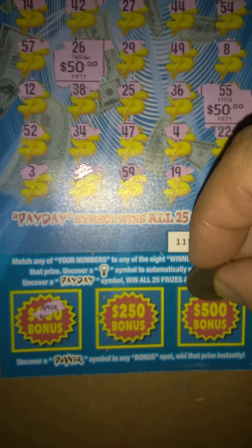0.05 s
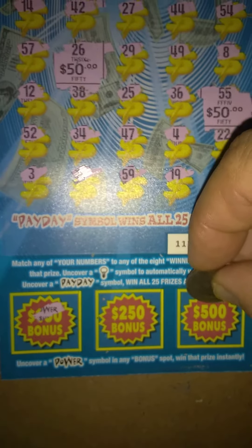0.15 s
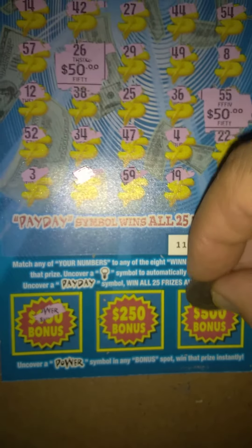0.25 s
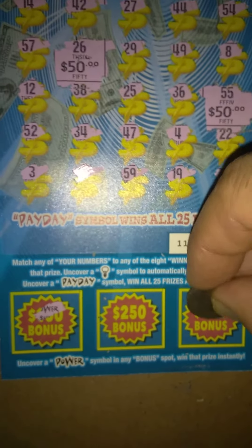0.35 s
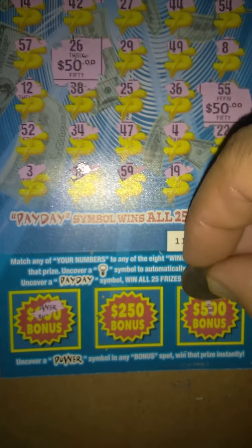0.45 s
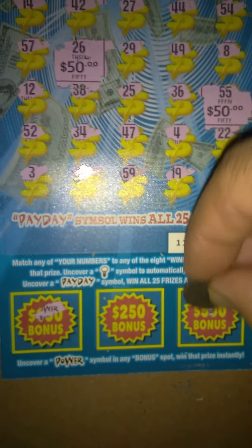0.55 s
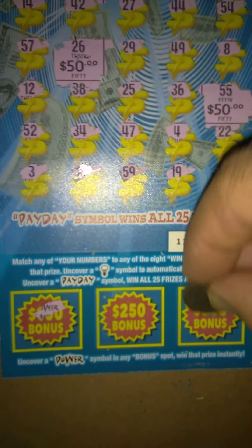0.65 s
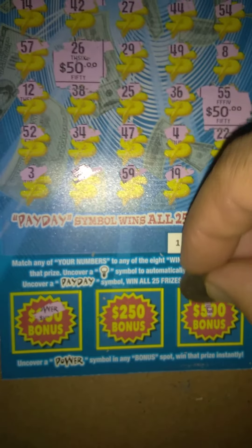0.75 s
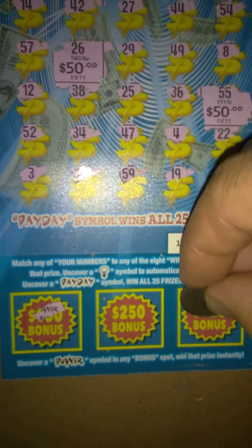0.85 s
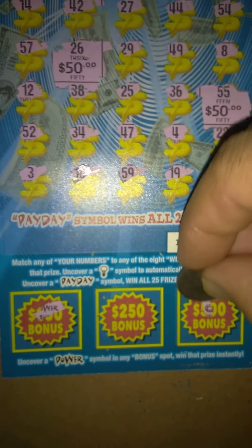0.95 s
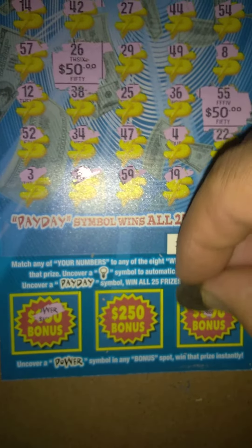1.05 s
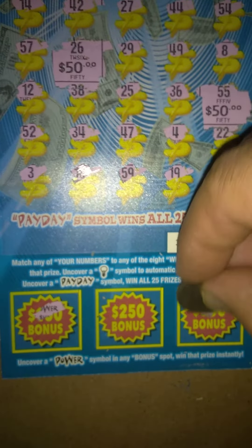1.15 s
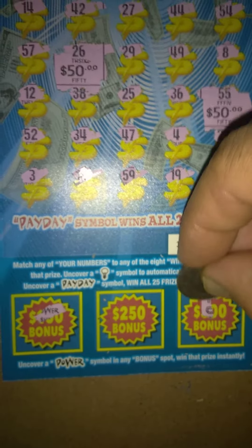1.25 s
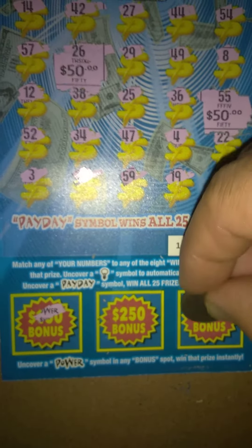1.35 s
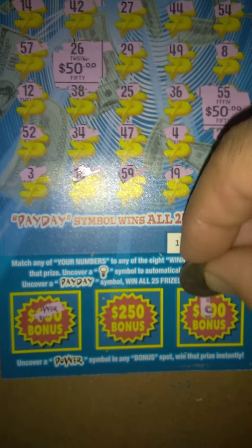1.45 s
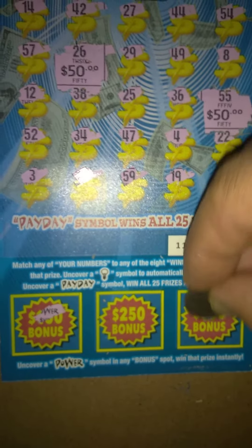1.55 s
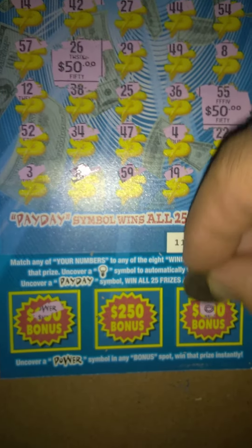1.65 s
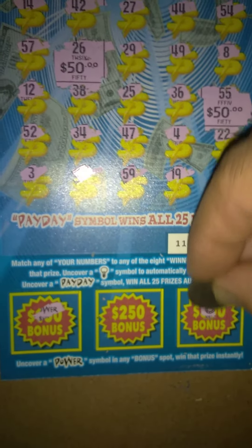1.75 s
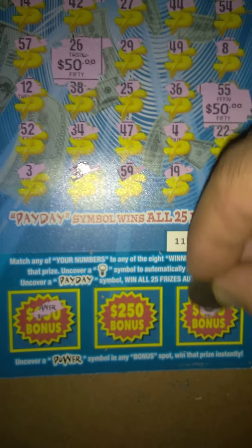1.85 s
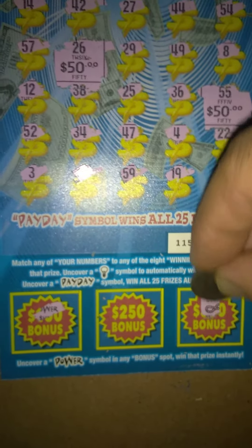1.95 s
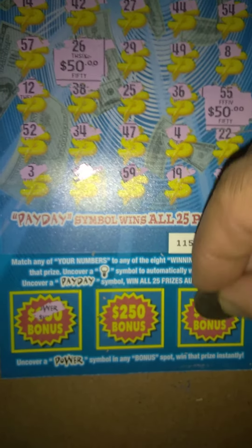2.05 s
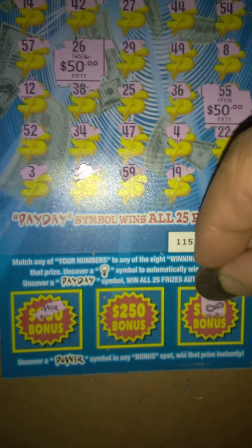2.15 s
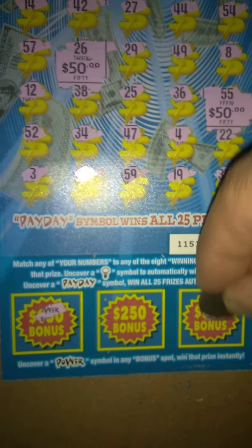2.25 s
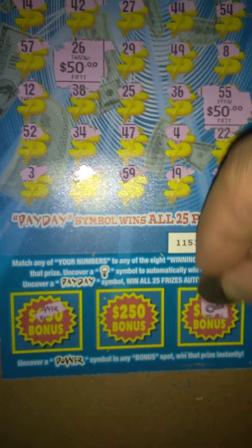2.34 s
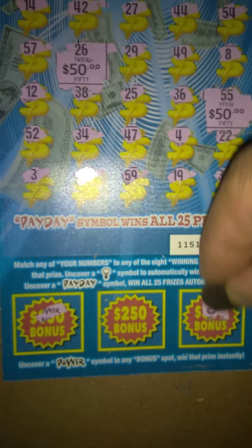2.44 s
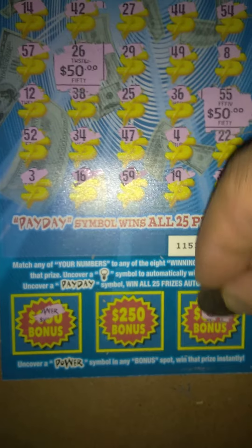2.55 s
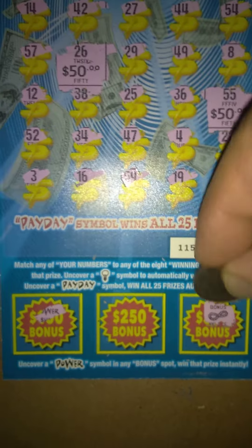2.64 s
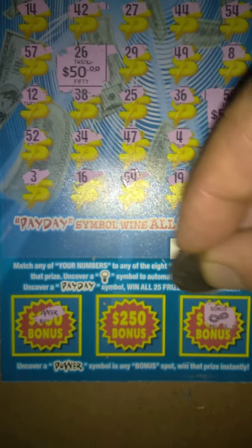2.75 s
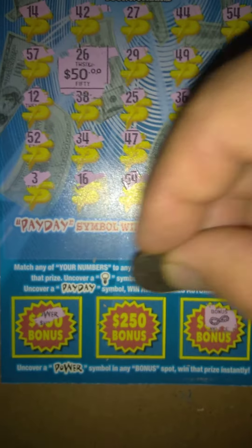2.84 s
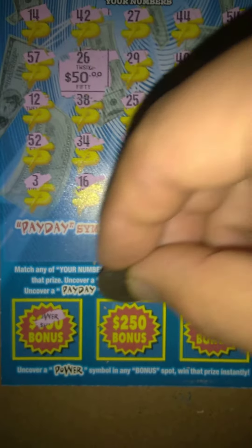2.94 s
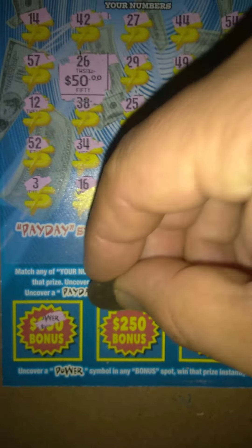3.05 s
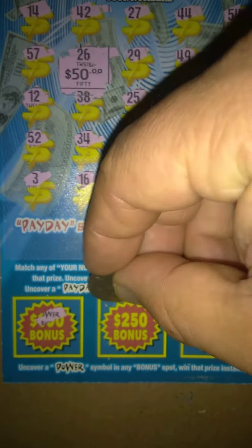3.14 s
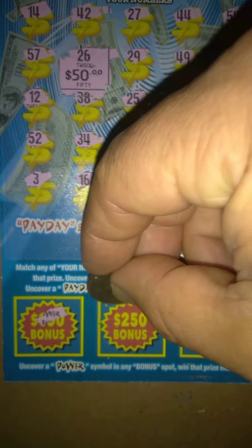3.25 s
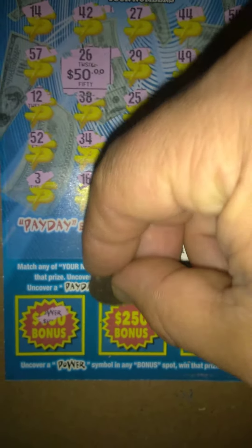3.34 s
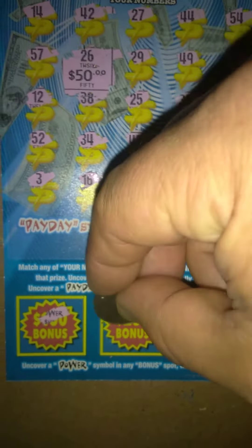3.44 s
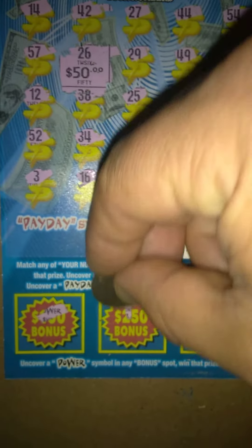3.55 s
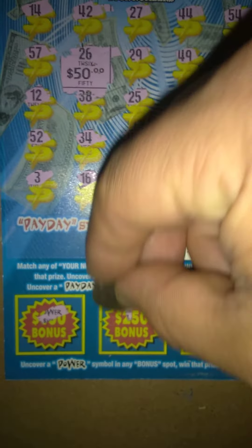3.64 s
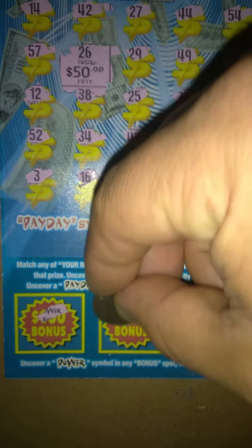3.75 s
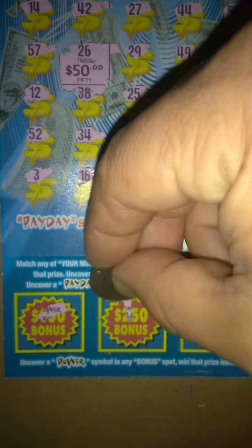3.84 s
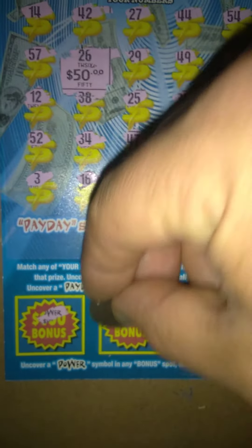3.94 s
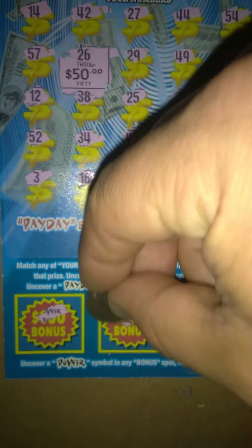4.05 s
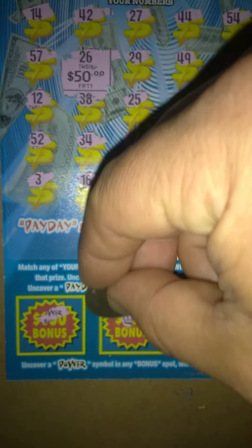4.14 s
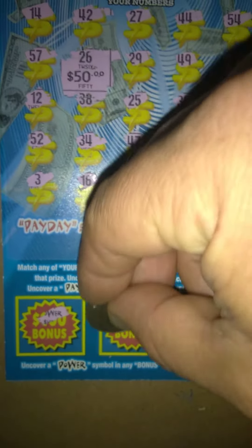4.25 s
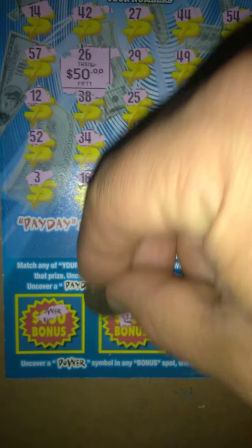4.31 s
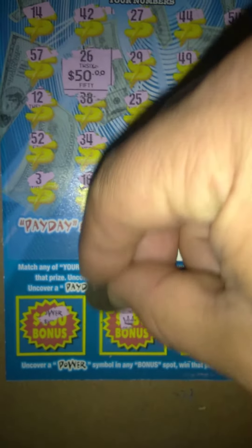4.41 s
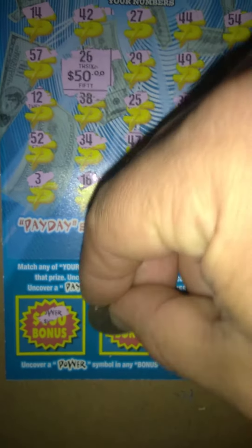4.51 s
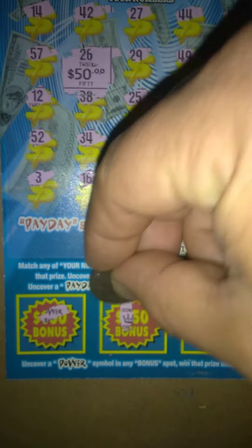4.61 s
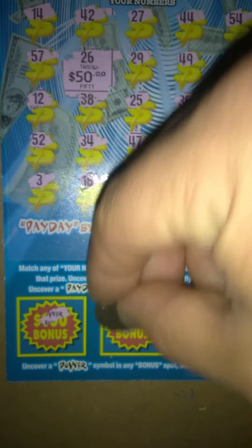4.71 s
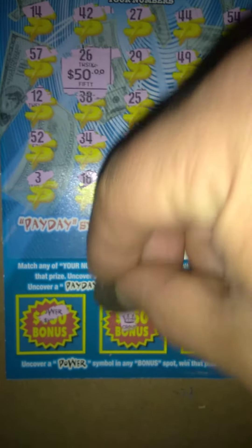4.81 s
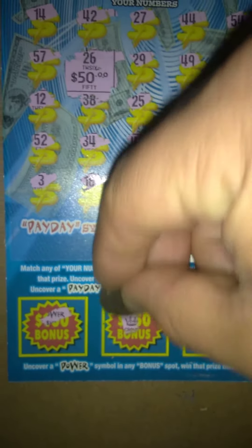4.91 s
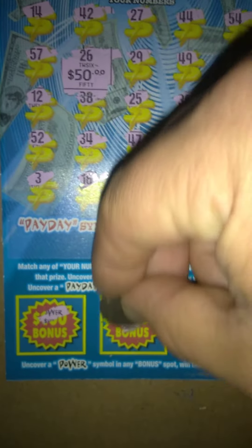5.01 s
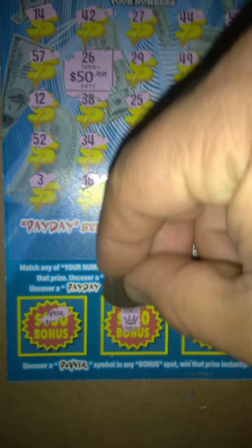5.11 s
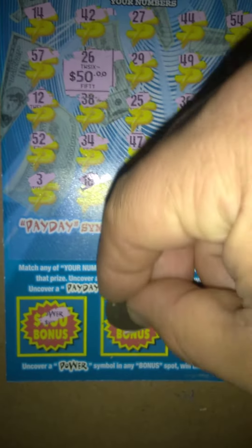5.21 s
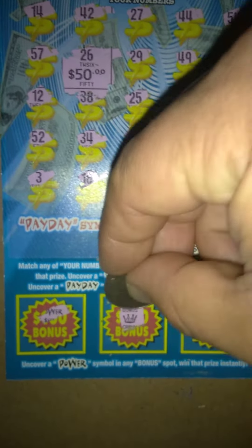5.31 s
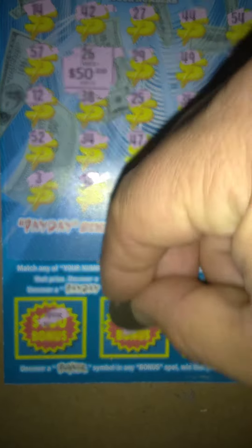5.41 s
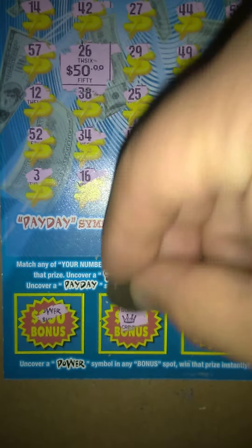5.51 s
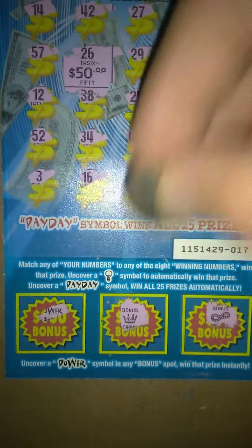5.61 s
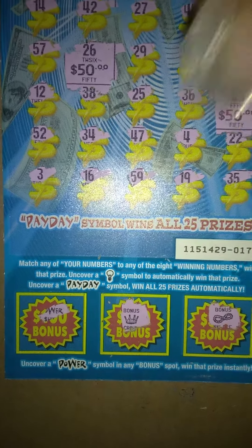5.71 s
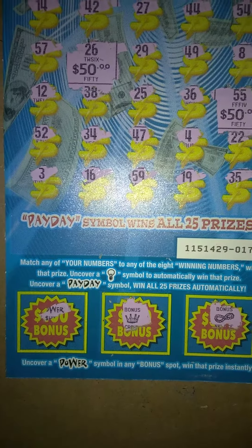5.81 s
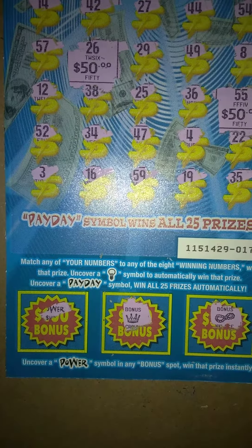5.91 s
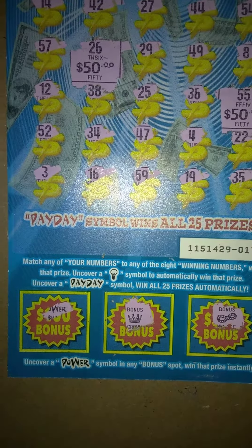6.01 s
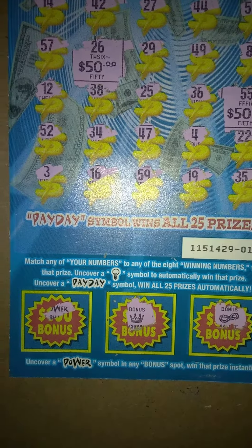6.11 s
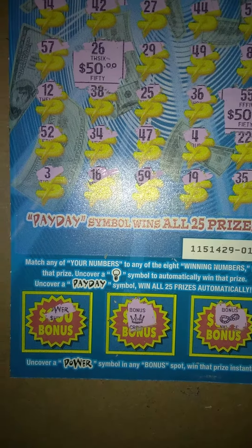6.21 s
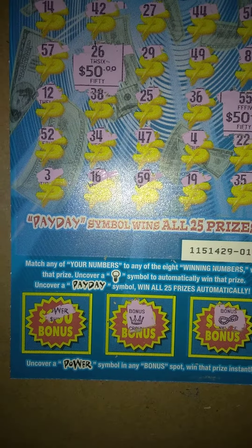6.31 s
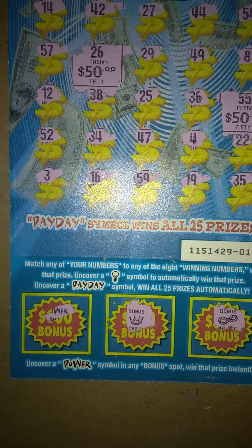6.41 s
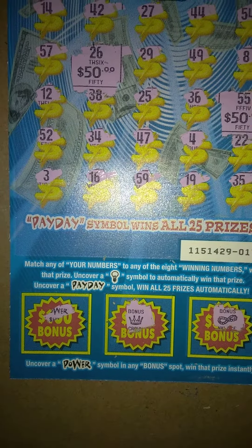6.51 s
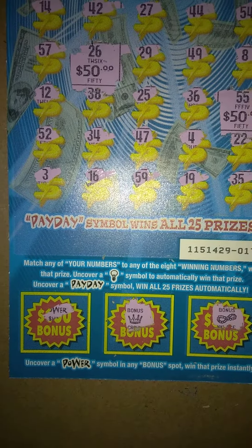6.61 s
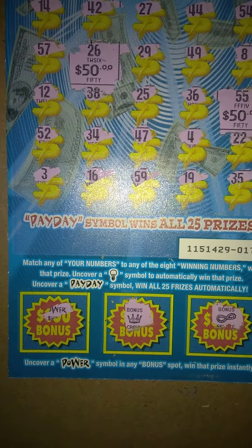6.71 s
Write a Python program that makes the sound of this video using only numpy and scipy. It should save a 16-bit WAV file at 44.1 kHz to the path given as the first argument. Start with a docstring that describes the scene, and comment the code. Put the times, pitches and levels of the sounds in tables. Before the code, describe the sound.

Rapid gritty scratching on a card on a table, a brief pause, then harder knocking scratches, ending in faint room noise.

```python
"""Coin scratching a card

A coin scrapes the coating off a card lying on a table, in two bursts of quick strokes, in a quiet room.
The edge sticks and slips; each slip rings damped modes of card and table top, and dust adds a hiss.
Knocks add short thuds, and a hand-held phone adds room noise, grip rumble and low bumps.
Its two microphones each lose a delayed copy of the other, which combs the sound."""
import sys
import numpy as np
from scipy import signal
from scipy.fft import rfft, irfft, next_fast_len
from scipy.io import wavfile
from scipy.ndimage import uniform_filter1d

SR = 44100
rng = np.random.default_rng(int(sys.argv[2]) if len(sys.argv) > 2 else 0)


def unload_wav(signal):
    """Save mono or channel-first audio to the path in sys.argv[1] as 16-bit WAV at rate SR, clipped to [-1, 1]."""
    wavfile.write(
        sys.argv[1],
        SR,
        np.round(np.clip(np.atleast_2d(signal).T, -1, 1) * 32767).astype(np.int16),
    )


N = 298370
T = np.arange(N) / SR


def amp(db):
    """Turns dB into a linear gain."""
    return 10 ** (np.asarray(db) / 20)


def evened(x):
    """Scales x to an RMS of 1."""
    return x / np.sqrt(np.mean(x ** 2) + 1e-20)


def over_time(points):
    """Draws straight lines over time through (s, value) points."""
    return np.interp(T, *np.transpose(points))


def read(points, hz):
    """Reads a curve of (Hz, value) points along a logarithmic frequency axis."""
    f, value = np.transpose(points)
    return np.interp(np.log(hz + 1), np.log(f + 1), value)


def shape(x, response):
    """Multiplies the spectrum of x by response(hz)."""
    size = next_fast_len(N + 4096)
    spectrum = rfft(x, size) * response(np.fft.rfftfreq(size, 1 / SR))
    return irfft(spectrum, size)[..., :N]


def room():
    """Air and microphone noise with a slowly moving level, most alike at both microphones in the bass."""
    # Colour of the noise. Each row: frequency in Hz, relative level in dB per Hz.
    room_colour = [(30, -46), (60, 7.5), (100, -9.5), (200, 0), (350, -10.5), (550, -14.5), (1000, -20.5),
                   (2000, -27), (4000, -32.5), (8000, -38), (14000, -43)]
    # How alike the microphones are. Each row: frequency in Hz, likeness from 0 to 1.
    room_likeness = [(60, 1), (150, 0.62), (300, 0.95), (500, 0.25), (700, 0.23), (5000, 0.014)]
    # Loudness of the noise. Each row: time in seconds, level in dB.
    room_level = [(0, -56), (3, -56.5), (6.3, -56), (6.42, -59.5), (6.77, -59)]
    near, other = rng.standard_normal((2, N))
    same = lambda f: np.clip(read(room_likeness, f), 0, 1)
    far = shape(near, same) + shape(other, lambda f: np.sqrt(1 - same(f) ** 2))
    noise = evened(shape(np.array([far, near]), lambda f: amp(read(room_colour, f))))
    return noise * amp(over_time(room_level))


def grip_rumble(low_hz=50, high_hz=105, shared=2.06):
    """Hand on the phone: band-passed noise through the case, partly shared by the microphones."""
    # Level of the rumble. Each row: time in seconds, level in dB, far minus near microphone in dB.
    grip_level = [(0, -53, 23), (.15, -55, 8), (.35, -54.5, -10), (1.35, -53, -2), (1.7, -59.5, -9),
                  (2.4, -46.5, 2), (2.85, -64, -11), (3.0, -52, 16), (3.45, -56.5, -4), (4.1, -59.5, -5.5),
                  (4.5, -51, -4), (5.2, -59.5, -9), (5.85, -56, 4), (6.45, -61, 1), (6.77, -59, -5)]
    far, near, common = rng.standard_normal((3, N))
    rise = lambda f: (f / low_hz) ** 3 / (1 + (f / low_hz) ** 3)
    band = lambda f: rise(f) / (1 + (f / high_hz) ** 5)
    rumble = evened(shape(np.array([far, near]) + shared * common, band))
    s, level_db, far_db = np.transpose(grip_level)
    tilt_db = np.interp(T, s, far_db) * np.array([[.5], [-.5]])
    return rumble * amp(np.interp(T, s, level_db) + tilt_db)


def bumps():
    """Bumps against the phone: short low sine pushes, opposite in sign at the two microphones."""
    # Each row: start in seconds, level in dB (of the far-to-near difference if both are equal),
    # frequency in Hz, length in cycles, far minus near microphone in dB.
    phone_bumps = [(0.184, -50, 67.6, 0.74, 10), (.63, -45, 100, 1.2, 16), (1.21, -34.5, 96, 1.2, 26),
                   (1.232, -32, 81, 2.1, 28.5), (2.349, -44, 88, 1.8, 34), (2.61, -43, 90, 1.6, 10),
                   (2.99, -45, 105, 1.3, 10), (5.546, -37, 96, 1.15, 20)]
    out = np.zeros((2, N))
    for s, db, hz, cycles, far_db in phone_bumps:
        progress = np.clip((T - s) * hz / cycles, 0, 1)
        push = -np.sin(2 * np.pi * hz * (T - s)) * np.sin(np.pi * progress) ** 0.3
        sides = np.array([[amp(far_db / 2)], [-amp(-far_db / 2)]])
        out += amp(db) * push * sides / 2
    return out


def slips(per_s=1800, spread_db=2.5, grit=0.42, lumps_db=0.62):
    """Uneven releases of the coin edge over fine grit, in lumps of about 10 ms."""
    size = amp(spread_db * np.minimum(rng.exponential(1, N), 4))
    released = rng.random(N) < per_s / SR
    clicks = evened(size * released * rng.choice([-1., 1.], N))
    rough = clicks + grit * rng.standard_normal(N)
    lumps = evened(uniform_filter1d(uniform_filter1d(rng.standard_normal(N), 300), 300))
    return evened(rough * amp(lumps_db * lumps))


def creep(low_db=5.5, high_db=-15.5):
    """Gains as the coin creeps and fingers brush the card: slow, so low modes lead and high ones are dull."""
    # Each row: time in seconds, effort in dB.
    creep_effort = [(0, -70), (.22, -68), (.4, -65), (1.4, -62.5), (2.5, -60.5), (2.65, -69), (3.38, -71.5),
                    (3.55, -65), (4.6, -64.5), (5.5, -65.5), (5.6, -69.5), (5.78, -66.5), (5.95, -73),
                    (6.3, -73), (6.77, -88)]
    return amp(over_time(creep_effort) + np.array([[low_db], [0], [high_db]]))


def stroke(start, rise, hold, effort_db, change_db, low_db, high_db):
    """Gains of the low, middle and high push: the edge takes hold, swells, arches and lets go."""
    grab_s, rise_db, arch_db, fall_db_per_s = 0.0017, 13, 0.5, 1497
    low_start_db, low_end_db = 5.5, 4.5  # the low modes gain at the start and as the coin digs in
    high_start_db, high_end_db, high_arch_db = 0.5, -1.5, 2  # high modes follow speed, fastest mid-stroke
    t = np.arange(round((rise + hold) * SR) + SR // 20) / SR
    early = np.clip(1 - t / rise, 0, 1)
    progress = np.clip((t - rise) / hold, 0, 1)
    arch = np.sin(np.pi * progress)
    effort = effort_db - rise_db * early + change_db * progress + arch_db * arch
    effort -= fall_db_per_s * np.maximum(t - rise - hold, 0)
    low = low_db + low_start_db * early + low_end_db * (progress - .5)
    high = high_db + high_start_db * early + high_end_db * (progress - .5)
    high += high_arch_db * (arch - .5)
    return np.minimum(t / grab_s, 1) * amp([effort + low, effort, effort + high])


def add_strokes(gain):
    """Adds the push of every coin stroke to the low, middle and high gains."""
    # Each row: start in seconds, rise in seconds, hold in seconds, effort in dB, change of effort
    # over the hold in dB, low modes in dB over effort, high modes in dB over effort.
    coin_strokes = [(0.244, 0.0074, 0.089, -44.5, 3, 6.5, -20), (0.407, 0.019, 0.051, -39, -2.5, -1, -13.5),
                    (0.543, 0.046, 0.029, -40, 1.5, 2, -18.5), (0.682, 0.022, 0.036, -39.5, -3, -4, -15.5),
                    (0.808, .016, 0.054, -40, -1, 2.5, -21), (0.968, 0.013, 0.03, -40, -1.5, 1.5, -12.5),
                    (1.068, .014, 0.05, -38.5, 0.5, 1.5, -20.5), (1.239, 0.022, 0.0047, -40, 1, 0, -12),
                    (1.309, 0.0098, 0.038, -46.5, -13, 6.5, -19), (1.365, 0.013, 0.0027, -37, 0.5, 4, -17),
                    (1.476, 0.011, 0.0037, -34, 0.5, 1, -9.5), (1.54, .016, 0.052, -36, -1, -0.5, -19),
                    (1.672, 0.0083, 0.037, -38.5, 2, -4, -11), (1.763, 0.023, .048, -32, -8, 0.5, -23.5),
                    (1.887, 0.014, 0.041, -43.5, 7.5, -3.5, -10),
                    (1.991, 0.032, 0.04, -34.5, -5, -0.5, -19.5),
                    (2.125, 0.018, 0.033, -37, -1, -4.5, -12.5), (2.237, 0.023, 0.038, -36, 0.5, 1, -19),
                    (2.351, 0.016, 0.038, -41, 4.5, -6.5, -13.5),
                    (2.453, 0.0089, 0.05, -39.5, 2, 0.5, -22.5), (2.99, 0.013, 0.057, -60.5, -5, -7, -13),
                    (3.399, 0.032, 0.067, -40, -4, 5, -16.5), (3.574, 0.012, 0.049, -38, -1.5, 0, -15),
                    (3.715, 0.0073, 0.043, -46.5, 6, 5, -15), (3.822, 0.0073, 0.043, -57.5, -6, 4, -17),
                    (3.881, 0.013, 0.0022, -37, -0.5, 2, -15), (3.956, 0.016, 0.054, -38, -2, 1, -16.5),
                    (4.086, 0.013, .05, -36, -6.5, 0.5, -16.5), (4.223, .014, 0.0426, -38, 3, 4, -22),
                    (4.332, .01, 0.023, -56, 0, 1, -12), (4.368, 0.015, 0.031, -34, -5, -3.5, -15),
                    (4.463, 0.028, .002, -43.5, -2.5, 2.5, -13),
                    (4.511, 0.02, 0.0014, -39, -0.5, 9.5, -15.5), (4.577, .02, 0.07, -61.5, 1, 0, -9),
                    (4.712, 0.011, .052, -41.5, 7.5, -1, -15.5), (4.815, 0.017, .02, -50, -6, -7, -12),
                    (4.842, 0.0092, 0.038, -42, 0.5, -3, -13.5), (4.933, 0.0095, 0.066, -37.5, -3, 3, -16),
                    (5.048, .01, 0.016, -56, -6, -4, -9), (5.065, 0.032, 0.024, -43, 5, -0.5, -10.5),
                    (5.165, .015, 0.057, -34, -2.5, 0, -18), (5.283, 0.009, 0.056, -42.5, 3, -1, -14.5),
                    (5.391, 0.022, .044, -33, -7, -1, -19.5)]
    for row in coin_strokes:
        push, at = stroke(*row), round(row[0] * SR)
        gain[:, at:at + push.shape[1]] += push


def add_knocks(drives):
    """The coin catches as it turns or stops: kicks the modes and returns thuds of the pinned card."""
    # Each row: time in seconds, thud peak in dB, middle modes in dB, high modes in dB.
    coin_knocks = [(.629, -36, -42, -37), (1.061, -30, -44, -55), (1.228, -36, -23, -33),
                   (1.432, -35, -30, -60), (1.761, -32, -35, -55), (1.999, -37, -32, -52),
                   (2.238, -32, -32, -52), (2.459, -26.5, -23, -55), (2.505, -51, -26, -52),
                   (2.567, -37, -33, -58), (2.609, -56, -34, -60), (2.991, -43, -46, -52),
                   (3.487, -27, -37, -46), (3.567, -33, -44, -57), (3.638, -26.5, -40, -50),
                   (3.697, -24.5, -32, -55), (3.824, -26, -36, -58), (3.946, -23, -24, -55),
                   (4.029, -23, -24, -55), (4.083, -27, -37, -55), (4.219, -27.5, -35, -58),
                   (4.267, -49, -28, -43), (4.337, -28.5, -26, -48), (4.462, -29.5, -40, -53),
                   (4.525, -26, -26, -50), (4.581, -32, -29, -56), (4.656, -25.5, -16, -27.5),
                   (4.701, -24, -22, -50), (4.773, -31, -35, -50), (4.819, -33.5, -34, -56),
                   (4.937, -22.5, -29, -50), (5.164, -27, -40, -58), (5.191, -44, -28, -45),
                   (5.389, -25.5, -39, -54), (5.447, -31, -38, -50), (5.544, -39, -24.5, -37.5),
                   (5.782, -46, -30.5, -42)]
    # Mode of the card pinned under the coin: frequency in Hz, width in Hz.
    thud_mode = (280, 250)
    blows = np.zeros(N)
    for s, thud_db, middle_db, high_db in coin_knocks:
        at = round(s * SR)
        blows[at] = amp(thud_db)
        drives[1:, at] += amp([middle_db, high_db])
    hz, width_hz = thud_mode
    t = np.arange(1024) / SR
    decay = np.exp(-np.pi * width_hz * t)
    thud = np.sin(2 * np.pi * hz * t) * decay * (1 - np.exp(-t / 0.00092))  # soft onset
    return signal.oaconvolve(blows, thud / abs(thud).max())[:N]


def dust(drives):
    """Dust hisses as hard as the edge slips: noise that follows the middle and high push."""
    # Hiss as the card is bared. Each row: time in seconds, dB over the mean of middle and high push.
    hiss_level = [(0, -27.5), (1.8, -25), (3.4, -25.5), (5.5, -26)]
    power = uniform_filter1d(abs(drives[1] * drives[2]), 40)  # about 1 ms
    return np.sqrt(abs(power)) * rng.standard_normal(N) * amp(over_time(hiss_level))


def ring(modes, spot):
    """Impulse response of a group of damped modes with alternating signs, scaled to energy 1."""
    t = np.arange(2048) / SR
    out = np.zeros(len(t))
    for k, mode in enumerate(modes):
        hz, width_hz, level_db = mode[0], mode[1], mode[2 + spot]
        decay = width_hz * np.exp(-np.pi * width_hz * t)
        out += (-1) ** k * amp(level_db) * decay * np.sin(2 * np.pi * hz * t)
    return out / np.linalg.norm(out)


def card(drives, move_s=2.9):
    """Each drive rings its group of card and table modes; the coin goes to a second spot at move_s."""
    # Modes of card and table. Each row: frequency in Hz, width in Hz, relative level in dB
    # at the first spot, relative level in dB at the second spot.
    low_modes = [(203.2, 79, -2.5, 0), (323, 125, 3, 5), (398, 160, 1.5, 3.5), (549, 86, -3, 3)]
    middle_modes = [(771, 87, 1, -39), (931, 142, 1.5, 8.5), (1030, 170, 1.5, 17.5), (1308, 174, -7, -7),
                    (1599, 230, -8, -9), (1670.5, 208, -8.5, -5)]
    high_modes = [(1810, 45, 6.5, -24), (2347, 151, 4, 15), (2803, 193, -1, 7), (3620, 330, -9.5, -3),
                  (3495, 580, -13.5, -0.5), (4304, 210, -10, -1)]
    top_modes = [(4900, 910, -1.5, 5), (5990, 1120, 2, 1.5), (6370, 690, 3.5, 0.5), (8360, 620, -5, 7),
                 (9600, 2600, -11, -6), (11500, 2200, -16, -8)]
    out = np.zeros(N)
    for drive, modes in zip(drives, (low_modes, middle_modes, high_modes, top_modes)):
        for spot, here in enumerate((T < move_s, T >= move_s)):
            out += signal.oaconvolve(drive * here, ring(modes, spot))[:N]
    return out


def coin():
    """Creep, strokes and knocks push the groups of modes; knocks also thud and dust hisses."""
    gain = creep()
    add_strokes(gain)
    drives = slips() * gain
    thuds = add_knocks(drives)
    return card(np.vstack([drives, dust(drives)])) + thuds


def two_paths(x, lag_s=0.000292, scatter=0.75, corner_hz=900):
    """Far and near microphone: the far one hears it later, shadowed, and scattered in the treble."""
    # Shadow at the far microphone. Each row: frequency in Hz, gain in dB.
    far_shadow = [(150, -3), (400, -5), (700, -6.5), (1000, -21.5), (1600, -14), (2500, -26), (4000, 3.5),
                  (8000, -4.5)]
    taps = rng.standard_normal(400) * np.exp(-np.arange(400) / 1800.0)
    scattered = signal.oaconvolve(x, taps / np.linalg.norm(taps))[:N]
    treble = lambda f: scatter / (1 + (corner_hz / (f + 1)) ** 6)
    mix = shape(x, lambda f: np.sqrt(1 - treble(f) ** 2)) + shape(scattered, treble)
    far = shape(mix, lambda f: amp(read(far_shadow, f)) * np.exp(-2j * np.pi * f * lag_s))
    return np.array([far, x])


def reflections(x, t60=0.16, wet_db=-18, corner_hz=500):
    """Short diffuse tail of the room, weak in the bass, other taps for each microphone."""
    t = np.arange(SR // 4) / SR
    tail = rng.standard_normal((2, len(t))) * amp(-60 * t / t60) * (t > .004)
    wet = signal.fftconvolve(x[None], tail / np.linalg.norm(tail[0]), axes=1)[:, :N]
    return amp(wet_db) * shape(wet, lambda f: f ** 2 / (f ** 2 + corner_hz ** 2))


def scene():
    """Scrape at both microphones with its room tail, over room noise and the handling of the phone."""
    scrape = coin()
    return two_paths(scrape) + reflections(scrape) + room() + grip_rumble() + bumps()


def record(dry, lag_s=0.0004833, share=0.77, dull_hz=8500, low_cut_hz=40, edge_hz=14230):
    """Each side loses a delayed, dulled copy of the other microphone; then low cut and band limit."""
    dulled = lambda f: share / (1 + (f / dull_hz) ** 4)
    late = shape(dry[::-1], lambda f: dulled(f) * np.exp(-2j * np.pi * f * lag_s))
    low_cut = signal.butter(3, low_cut_hz, "high", fs=SR, output="sos")
    cut = signal.sosfilt(low_cut, dry - late)
    band_limit = signal.firwin(511, edge_hz, window=("kaiser", 9), fs=SR)
    return signal.oaconvolve(cut, band_limit[None], "same")


dry = scene()
out = record(dry)
unload_wav(out)
```